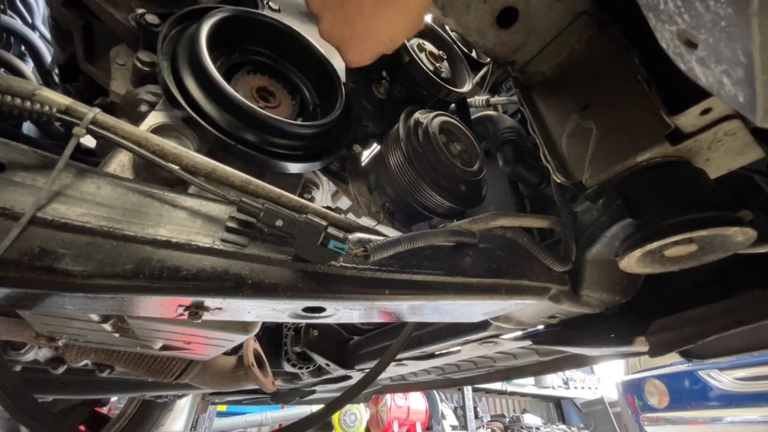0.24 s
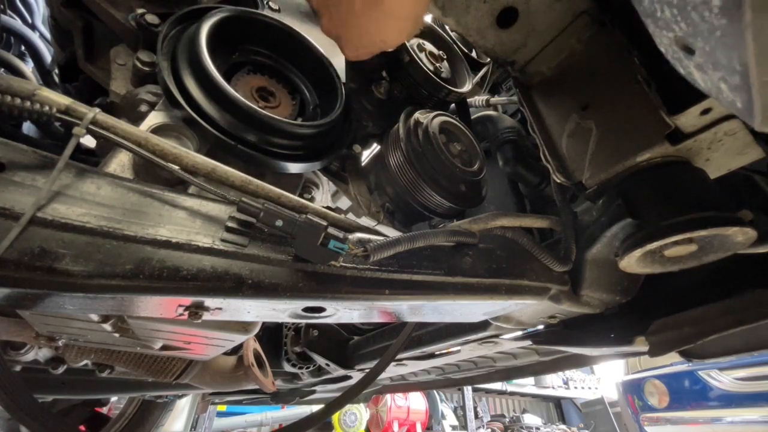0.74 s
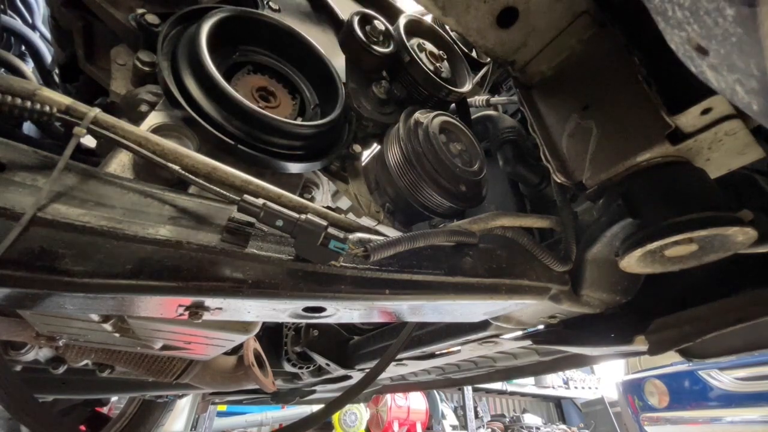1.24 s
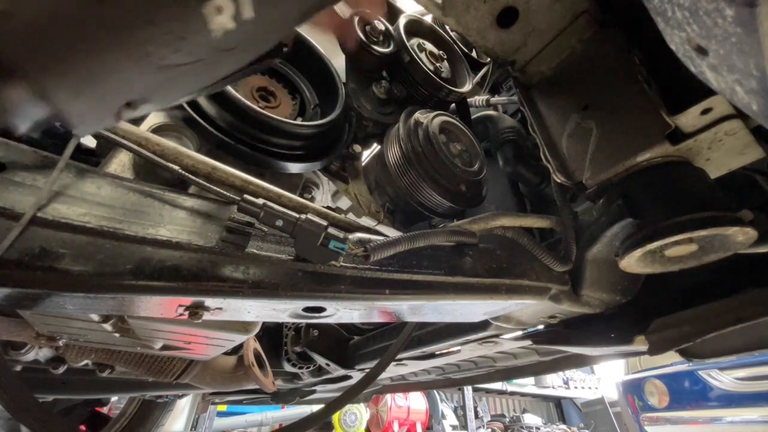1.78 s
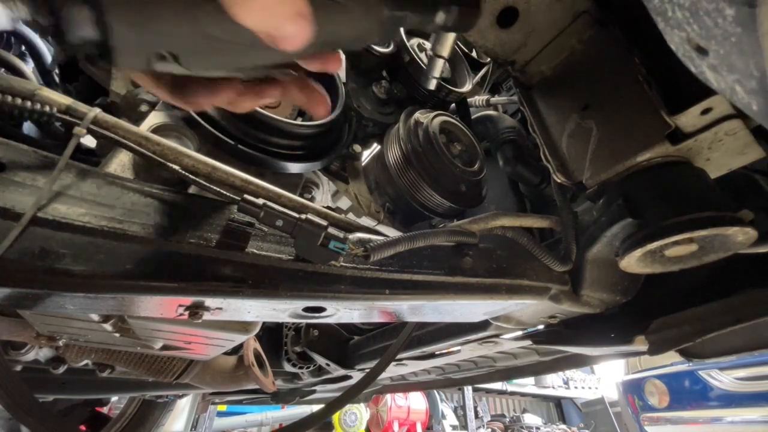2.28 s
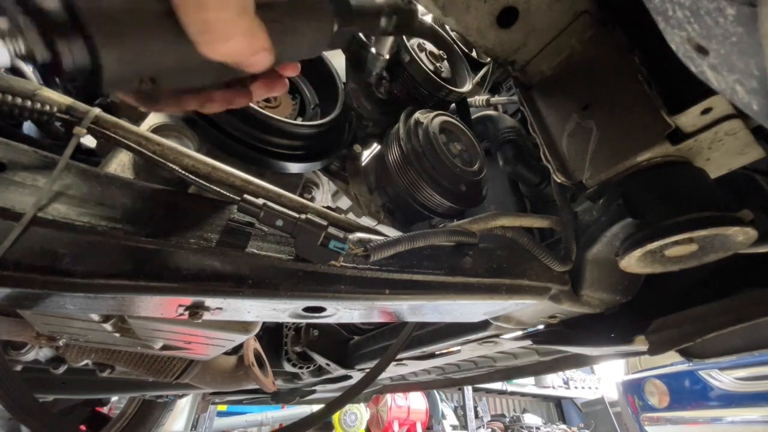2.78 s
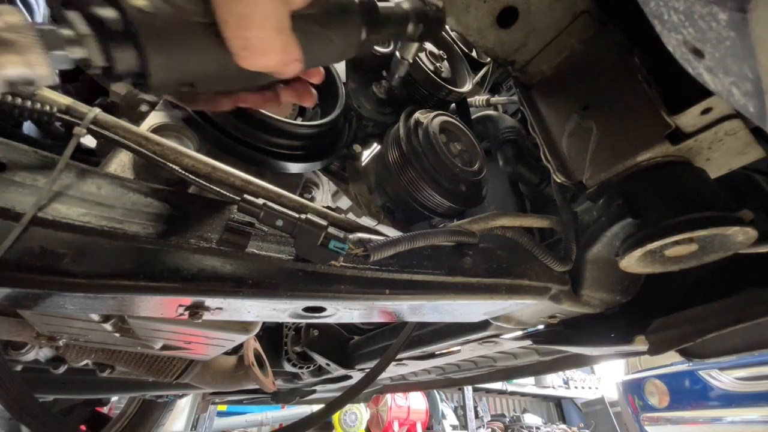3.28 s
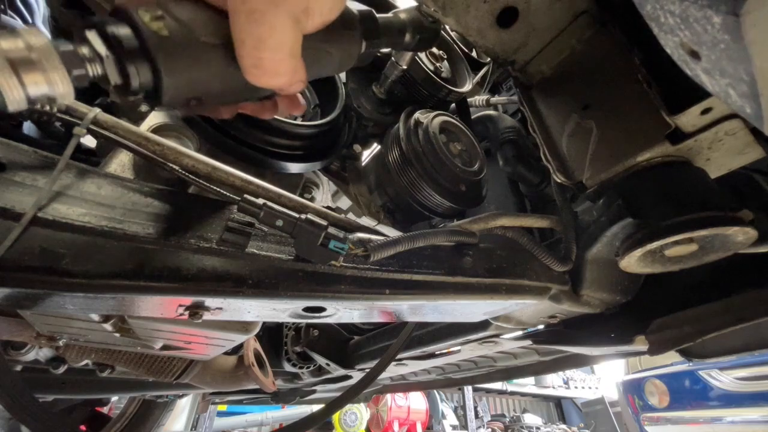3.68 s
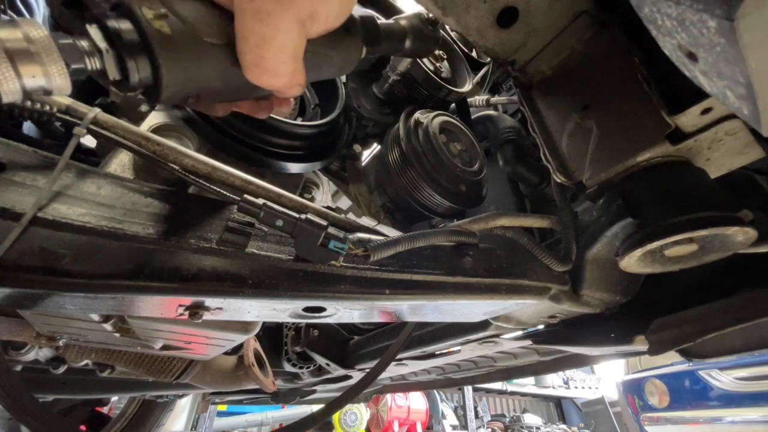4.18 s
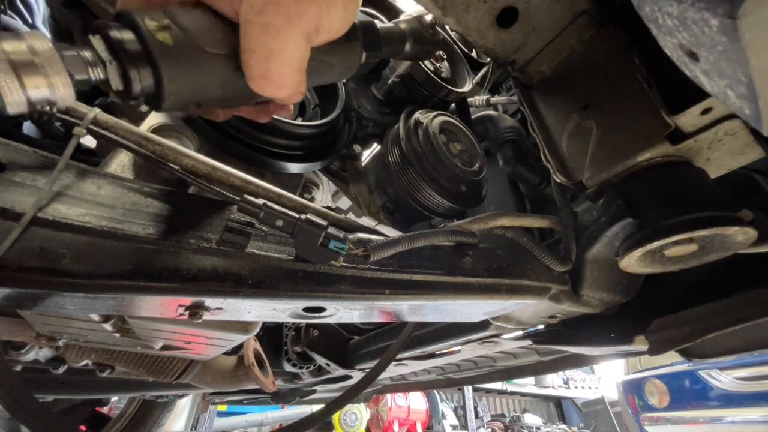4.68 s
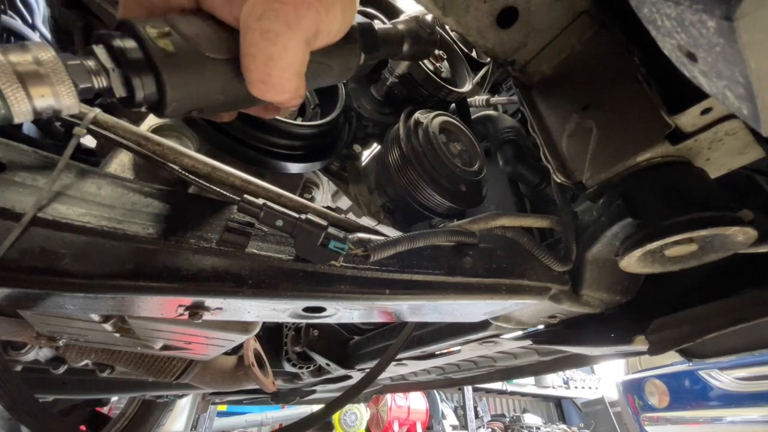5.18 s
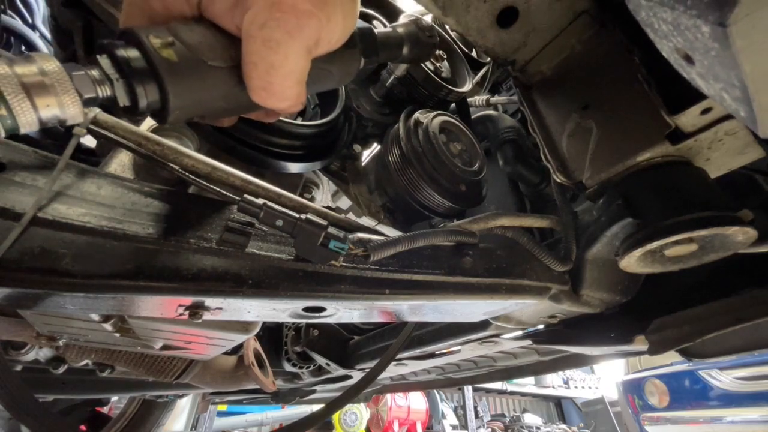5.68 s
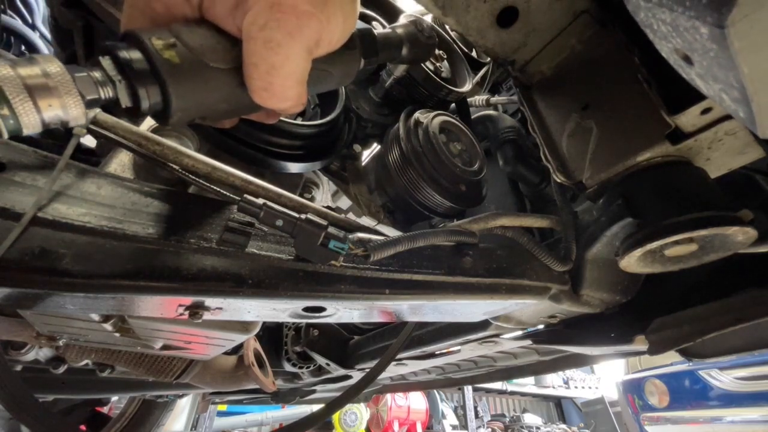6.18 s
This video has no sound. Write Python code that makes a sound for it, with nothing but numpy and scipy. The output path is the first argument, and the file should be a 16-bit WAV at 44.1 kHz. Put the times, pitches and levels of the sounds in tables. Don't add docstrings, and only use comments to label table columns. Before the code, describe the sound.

Quiet low garage rumble with soft hand and sleeve rubbing, then a cluster of small taps and clamp tinkles as an air tool is carried in. One loud steel knock, lighter metal clicks and hollow plastic thumps follow. The air ratchet then fires three short hissing, whining bursts and a long continuous run. Close stereo camera microphone, mostly dry in the engine bay, the background ducking under the tool.

```python
import sys
import numpy as np
from scipy import signal
from scipy.fft import rfft, irfft, next_fast_len
from scipy.io import wavfile
from scipy.ndimage import uniform_filter1d

SR = 44100
rng = np.random.default_rng(int(sys.argv[2]) if len(sys.argv) > 2 else 0)


def generate_wav(sig):
    pcm = np.round(np.clip(np.atleast_2d(sig).T, -1, 1) * 32767).astype(np.int16)
    wavfile.write(sys.argv[1], SR, pcm)


def boost(x):
    u = np.asarray(x, float) / 20
    return 10 ** u


N = 283959
T = np.arange(N) / SR

# (open [s], shut [s], spin-up [s], start whine [dB], coasting whine [dB])
PULLS = [
    (3.868, 4.031, .031, -8, -2),
    (4.331, 4.585, .041, -7, -10),
    (4.727, 4.974, .033, -25, -8),
    (5.064, 6.6, .041, -30, -30),
]
# (time [s], vane passes [Hz])
TOP_SPEED = [(3.9, 1200), (4.03, 1190), (4.39, 1790), (4.425, 1765), (4.46, 1795), (4.53, 1800),
             (4.58, 1770), (4.82, 1775), (4.89, 1768), (4.97, 1720), (5.12, 1722), (5.22, 1716),
             (5.3, 1686), (5.4, 1662), (5.6, 1603), (5.8, 1556), (6.0, 1516), (6.1, 1510), (6.44, 1520)]
# (running whine [dB], valve puff [dB], thump [dB])
EFFORT = [(-31.5, -10, -20), (-36.5, -12.5, -32), (-33.5, -33, -47), (-39, -63, -49)]
LAG_POWERS = (1.3, 2.2, 1.5, 1.8)
COASTS = (.048, .043, .044, .047)
STRAIN_LEVELS = (-23, -25.5, -38, -43)
OCTAVE_LEVELS = (-6, 4, -10, 2)
STRAIN_S = .082


def rotor():
    hz, labour, running, pumping, puff, thump, strain, octave = np.zeros((8, N))
    top = np.interp(T, *np.transpose(TOP_SPEED))
    for pull, effort, lag, strain_db, coast, octave_db in zip(
            PULLS, EFFORT, LAG_POWERS, STRAIN_LEVELS, COASTS, OCTAVE_LEVELS):
        on, off, rise, start_db, coast_db = pull
        run_db, puff_db, thump_db = effort
        since, after, now = np.maximum(T - on, 0), np.maximum(T - off, 0), T >= on
        spin_up = .05 + .95 * (1 - np.exp(-(since / rise) ** lag))
        hz[now] = (top * spin_up * np.exp(-after / coast))[now]
        octave[now] = octave_db
        slow = np.exp(-(hz / 850) ** 6 - (since / .05) ** 6)
        labour[now] = (boost(start_db) * slow * np.minimum(since / .006, 1))[now]
        running[now] = (boost(run_db) * np.exp(-after / .006) * np.minimum(since / .052, 1) ** 3)[now]
        suction = np.exp(-after / .027) + .11 * np.exp(-after / .065)
        pumping[now] = (boost(coast_db) * (1 - np.exp(-(after / .014) ** 2)) * suction)[now]
        strain[now] = (boost(strain_db) * np.exp(-(since / STRAIN_S) ** 4))[now]
        puff += boost(puff_db) * since / .007 * np.exp(1 - since / .007)
        jolt = since / 0.015 * np.exp(1 - since / 0.015)
        thump += boost(thump_db) * jolt * np.sin(2 * np.pi * 70 * since)
    return hz, labour, running, pumping, puff, thump, strain, octave


# (jet [dB], first surge [dB], valve opening [s])
FLOW = [(-16, 4.5, 0.0042), (-18, 7, 0.0024), (-16.5, 1.2, 0.022), (-20, 0, 0.02)]
# (level over jet [dB], share of surge [1], share of sag [1])
LAYERS = [
    (0, 0.58, 0.87),
    (-5.5, 1.4, 0.45),
    (-30.5, 2.86, 0.62),
]
# (linger [s], fall [dB/s], back-puff [dB], leak [dB])
DYING = [
    (.001, 422, -1, -57),
    (0.031, 426, -1, -50.5),
    (.04, 350, 9.5, -51),
]
# (time [s], jet level [dB], fall time [s per 10 dB])
SPURTS = [(4.075, -30, -0.22), (4.102, -55, -0.5), (4.376, -7.5, -0.0228)]
SHUT_DB, SURGE_S, SAG_DB, SAG_S, BACK_PUFF_S = 26.5, 0.072, 10, 0.54, 0.038


def airflow():
    gains = []
    for (over_db, surge, sag), (linger, fall_db, back_db, leak_db) in zip(LAYERS, DYING):
        gain = boost(leak_db) * (T >= PULLS[0][0])
        for (on, off, *_), (db, surge_db, opening) in zip(PULLS, FLOW):
            opened = on + opening
            since, after = np.maximum(T - opened, 0), np.maximum(T - off, 0)
            level_db = db + over_db - SHUT_DB * np.maximum((opened - T) / opening, 0)
            level_db = level_db + surge * surge_db * np.exp(-since / SURGE_S)
            level_db = level_db - sag * SAG_DB * (1 - np.exp(-since / SAG_S))
            level_db = level_db + back_db * np.minimum(after / BACK_PUFF_S, 1)
            level_db = level_db - fall_db * np.maximum(after - linger, 0)
            gain = np.hypot(gain, boost(level_db))
        gains.append(gain)
    jet, roar, gust = gains
    return np.hypot(jet, swells(SPURTS, 0.15) * (T >= PULLS[0][0])), roar, gust


# (multiple [1], driven level [dB], coasting level [dB])
VANES = [(1, 0, 0), (2, -5, -13), (3, -6, -27), (4, -9, -36), (5, -6, -42), (6, -19, -46)]
# (frequency [Hz], level [dB])
MUFFLER = [(100, -17), (250, -6), (500, -1), (900, 2.5), (1380, -5), (1580, -18), (1640, -5.5), (1790, 4),
           (2300, 2), (3050, 5), (3250, 4), (3400, -3), (3600, 3), (4750, 5), (5350, -6), (6200, 11),
           (8000, -1), (8550, 21), (9000, 14), (9600, 34)]
# (frequency [Hz], level [dB])
STRAIN = [(1500, -21), (2050, 3.5), (2400, -4), (2750, 9.5), (3300, -8), (4500, -27)]
# (frequency [Hz], level [dB])
JET = [(3000, -22.5), (5000, -10), (7000, -6), (8500, 0), (11500, 2.5), (13000, 2.5), (16000, -6.5)]
# (frequency [Hz], level [dB])
ROAR = [(800, -20), (1650, -8), (2250, -2.5), (3000, 0), (4000, -1), (5500, -2.5), (7500, -3.5),
        (10000, -52)]
# (frequency [Hz], width [Hz], level over the rest [dB])
HOUSING = [(2504, 126, 6), (3180, 110, 2)]
# (frequency [Hz], level [dB])
GUST = [(40, -32), (150, -7), (250, -19), (500, -8), (850, -2), (1100, -8.5), (1450, -5.5), (1900, -12.5),
        (3000, -23)]
# (frequency [Hz], level [dB])
PUFF = [(60, -20), (190, -13), (290, 0), (500, -3), (800, -12), (1400, -30)]
PASSES_PER_PAWL = 22.5


def ratchet():
    hz, labour, running, pumping, puff, thump, strain, octave = rotor()
    unsteady = .012 * np.clip((1600 / (hz + 1)) ** 3, 1, 3)
    jitter = uniform_filter1d(rng.standard_normal(N), size=300)
    turns = np.cumsum(hz * (1 + unsteady * jitter)) / SR
    flutter = boost(.6 * evened(uniform_filter1d(rng.standard_normal((len(VANES), N)), size=700)))
    whine = np.zeros(N)
    for waver, (k, db, coast_db) in zip(flutter, VANES):
        driven = waver * running * boost(db + octave * (k == 2))
        undriven = (labour + pumping) * boost(coast_db)
        whine += (driven + undriven) * boost(read(MUFFLER, k * hz)) * np.cos(2 * np.pi * k * turns)
    for k in range(2, 5):
        whine += strain * boost(read(STRAIN, k * hz)) * np.cos(2 * np.pi * k * turns)
    stroke = turns / PASSES_PER_PAWL
    bite = boost(2.2 * rng.standard_normal(400))[stroke.astype(int) % 400] * np.exp(-(stroke % 1) / .1)
    spit = boost(0.53 * evened(uniform_filter1d(rng.standard_normal(N), size=60)))
    jet, roar, gust = airflow()
    air = jet * boost(9) * hiss(JET, 0.19, spit * (1 + 0.4 * bite))
    air = air + roar * boost(3.0) * peaked(hiss(ROAR, 0.75, 1 + 1.19 * bite), HOUSING)
    air = air + gust * boost(8.0) * hiss(GUST, 1.0) + puff * hiss(PUFF, 1.2)
    return np.sqrt(2) * whine + air + thump


# (frequency [Hz], level [dB])
SEEP = [(300, -25), (480, -2), (980, 0), (1200, -20), (1650, -18), (2000, -4), (2700, -9), (5000, -16)]
# (time [s], level [dB], fall time [s per 10 dB])
SEEPS = [(4.125, -42, .6)]


def seep():
    return swells(SEEPS, .02) * hiss(SEEP, 1.5)


# (time [s], peak [dB], thud over it [dB], crack over it [dB], t60 [s])
TAPS = [(0.5026, -57, -9, -27, 0.079), (0.871, -55, -4, 9, 0.0386), (0.952, -34.5, -3, 14, 0.015),
        (1.144, -53.5, -15, 5, 0.107), (1.292, -27, -4, -10, 0.066), (1.379, -27.5, -5, -9, 0.08),
        (1.4246, -19.5, -7, -12, 0.16), (1.5388, -33, -4, -15.5, 0.036), (1.5565, -34, -4, -17, 0.07),
        (1.608, -37, -6, 8, 0.058), (1.6675, -29.5, -5, -6, 0.096), (1.6995, -21.5, -4, -13, 0.074),
        (1.728, -19.5, -2.5, -10, 0.15), (2.0367, -31.5, 1.5, -24.5, 0.19), (2.149, -34.5, -2, -25, 0.18)]
# (time [s], peak [dB], thud [dB], crack [dB], t60 [s])
KNOCKS = [(2.3573, -1, -19, -5, 0.064), (2.914, -23, -28, -5, 0.046), (3.115, -24, -25, -32, 0.072),
          (3.1325, -21.5, 0, -31, 0.063), (3.208, -28, -8, -32, 0.034), (3.3603, -22, -24, -3, 0.039),
          (3.3824, -16, -10, -19, 0.077), (3.4389, -33.5, 10, -21, 0.042), (3.4616, -35.5, 3.5, -6, 0.024),
          (3.492, -44, 4, -27, 0.081), (3.5236, -43, 4, -33, 0.088), (3.602, -35.5, -12, -31.5, 0.089),
          (4.1006, -20.5, 2, 4, 0.035), (4.63, -27, -1.5, 7, 0.035), (4.7084, -34, -1, 0, 0.031),
          (4.7224, -33, 1, 3, 0.19), (5.0338, -25, -4, 3, 0.031)]
# (time [s], peak [dB], thud [dB], crack [dB], t60 [s])
MORE_TAPS = [(1.2223, -45, -10, -6, .03), (1.511, -33, -10, -8, .04), (1.639, -33, -10, -11, .04),
             (1.994, -39.5, -8, -6.5, .03), (2.401, -26.5, 3, -14, .04), (.968, -36.5, 6, -15, 0.071)]
# (frequency [Hz], level [dB])
STEEL = [(1060, 3), (1310, 3), (1585, -1), (1810, -3), (2100, -5), (2540, -5), (2900, -7), (3500, -10),
         (4200, -8)]
# (frequency [Hz], level [dB])
HOLLOW = [(190, -6), (330, -4), (490, -3), (600, 0), (860, -7)]


def knocks():
    out, t = np.zeros(N + 9000), np.arange(4500) / SR
    sag = t + .009 * (1 - np.exp(-t / .022))
    for s, db, thud_db, crack_db, t60 in TAPS + KNOCKS + MORE_TAPS:
        luck, grit = rng.standard_normal((2, 14)), rng.standard_normal((2, 4500))
        steel, thud = np.zeros((2, 4500))
        for (f, d), a, b in zip(STEEL, *luck):
            steel += boost(d + 1.5 * b - 60 * t / .011) * np.sin(2 * np.pi * f * (1 + .012 * a) * t + 4 * b)
        for (f, d), a, b in zip(HOLLOW, *luck[:, 9:]):
            thud += boost(d + 1.0 * b - 0.32 * f * t) * np.sin(2 * np.pi * f * .76 * sag + 3 * a)
        scrape = grit * boost(-60 * t / t60) * np.minimum(t / 0.00027, 1)
        ring = signal.fftconvolve(scrape[0], steel)[:4500]
        rough = 1 + 3 * uniform_filter1d(grit[1], size=120)
        thud = thud * rough * boost(-60 * t / (1.8 * t60)) * np.minimum(t / .004, 1)
        blow = ring / abs(ring).max() + boost(thud_db - 2.5) * thud / abs(thud).max()
        blow = blow + boost(crack_db + 0.5) * np.diff(scrape[1], prepend=0)
        out[round((s - .0015) * SR):][:4500] += boost(db + 1.0) * blow
    return out[:N]


def rings(blows, modes, attack=0.00054):
    out, t = np.zeros(N + 6000), np.arange(6000) / SR
    for (s, db), luck in zip(blows, rng.standard_normal((len(blows), 2, len(modes)))):
        ring = np.zeros(6000)
        for (f, d, t60), a, b in zip(modes, *luck):
            decay = boost(d + 1.4 * b - 60 * t / t60)
            ring += decay * np.sin(2 * np.pi * f * (1 + 0.01 * a) * t + 3 * b)
        out[round(s * SR):][:6000] += boost(db) * ring * np.minimum(t / attack, 1)
    return out[:N]


# (frequency [Hz], level [dB], t60 [s])
BRACKET = [(634, -12, 0.12), (1050, -4.5, 0.055), (1166, -21.5, 0.11), (1314, 0, 0.055),
           (1590, -1.5, 0.059), (1850, -2, 0.07), (2160, -6, 0.06), (2480, -7, 0.11), (2980, -3.5, 0.037),
           (4090, -10, 0.082), (5400, -21, .068)]
# (frequency [Hz], level [dB], t60 [s])
SOCKET = [(1340, -1, 0.06), (2040, -13, 0.063), (2380, -8.5, 0.033), (2856, -2.5, 0.024), (3395, -3, 0.041),
          (4100, -4.5, 0.053), (4900, -10.5, .052), (5320, -7, 0.025), (6300, -16, .04)]
# (frequency [Hz], level [dB], t60 [s])
LEVER = [(700, -14, .04), (2060, -0.5, 0.025), (2670, -0.5, .03), (3150, 4, .03)]
# (time [s], level [dB])
BRACKET_BLOWS = [(1.293, -39.5), (1.4235, -41), (2.3585, -8.5), (2.51, -44), (2.686, -41), (3.492, -50),
                 (3.527, -47)]
# (time [s], level [dB])
SOCKET_BLOWS = [(2.9115, -24), (3.1125, -32), (3.207, -54), (3.3595, -21), (3.383, -23.5), (3.441, -44),
                (3.6015, -48)]
# (time [s], level [dB])
LEVER_BLOWS = [
    (3.867, -27),
    (4.3285, -14.5),
    (4.719, -39),
]


def struck_metal():
    return rings(BRACKET_BLOWS, BRACKET) + rings(SOCKET_BLOWS, SOCKET) + rings(LEVER_BLOWS, LEVER)


# (frequency [Hz], level [dB], t60 [s])
COVER = [(250, -10, .16), (400, -6, .15), (545, 0, .06), (625, -4, .07), (880, -10, .08)]
# (time [s], level [dB])
COVER_BLOWS = [(3.132, -14.5), (3.2055, -22), (3.382, -9.5), (1.4, -33)]
# (frequency [Hz], level [dB], t60 [s])
CLAMP = [(2950, -4, .035), (3250, -2, .04), (3500, 0, .04), (4050, -4, .03), (4800, -5, .03)]
# (time [s], level [dB])
CLAMP_BLOWS = [(1.294, -38), (1.318, -41), (1.3794, -34), (1.4248, -30), (1.44, -35), (1.6378, -37),
               (1.6668, -33), (1.6992, -34), (1.7266, -30), (1.75, -36), (1.835, -38), (2.04, -44),
               (2.1512, -42)]


def cover_and_clamp():
    return rings(COVER_BLOWS, COVER, .004) + rings(CLAMP_BLOWS, CLAMP)


# (start [s], length [s], frequency [Hz],
# level [dB])
HUMS = [(0.961, 0.12, 70.5, -33), (1.44, 0.21, 74.7, -32), (1.709, 0.124, 74.7, -25),
        (1.972, 0.18, 76, -29.5), (2.139, 0.17, 70.7, -36.5), (1.4, .08, 185, -41), (1.66, .14, 186.4, -39),
        (1.279, .09, 612, -38.5), (2.099, .16, 612, -52.5), (1.699, 0.13, 855, -40),
        (2.12, 0.072, 870, -47), (2.412, 0.066, 1052, -47), (2.492, 0.039, 1328, -42),
        (2.597, .09, 1590, -50), (3.869, .03, 285, -15.5), (4.332, .05, 204, -22), (4.038, .025, 110, -31),
        (5.627, 0.21, 1330, -52.5), (5.78, 0.21, 1160, -45.5), (5.9, .2, 590, -48), (5.932, 0.13, 820, -48)]


def hums():
    out = np.zeros(N)
    for s, length, hz, db in HUMS:
        t = np.arange(0, length, 1 / SR)
        wobble = 1 + .25 * uniform_filter1d(rng.standard_normal(len(t)), size=600)
        tone = np.sin(2 * np.pi * hz * np.cumsum(wobble) / SR)
        out[round(s * SR):][:len(t)] += boost(db) * np.sin(np.pi * t / length) ** 0.55 * tone
    return np.sqrt(2) * out


# (time [s], fall time [s per 10 dB], drag [dB], scuff [dB], fizz [dB])
STROKES = [(.03, 0.15, -52, -64, -57.5), (.16, 0.5, -48.5, -88.5, -101), (.32, 0.2, -66, -69, -66.5),
           (.68, 0.5, -61.5, -93.5, -95.5), (.8, 0.4, -70, -69, -59.5), (.91, 0.08, -66, -53, -46.5),
           (.954, 0.02, -35.5, -39.5, -37), (1.25, -0.55, -43, -66, -55), (1.52, 0.72, -37.5, -47.5, -44),
           (1.65, 0.21, -30, -42.5, -46), (1.8, 0.11, -32, -47, -46), (1.86, 0.1, -55, -62, -40),
           (1.97, .5, -42.5, -57, -51.5), (2.18, -0.73, -44, -58.5, -66.5), (2.32, -1.4, -64, -64, -55.5),
           (2.42, 0.12, -47, -53, -76), (2.52, 0.18, -49, -47.5, -74), (2.67, 0.2, -50.5, -56, -65),
           (2.95, 0.15, -52, -60, -84), (3.18, 0.15, -38.5, -69, -78), (3.42, 0.04, -32, -56, -85),
           (3.54, 2, -51, -70.5, -70.5)]
# (time [s], fall time [s per 10 dB], drag [dB], scuff [dB], fizz [dB])
GRABS = [(.503, 0.36, -43, -65, -90), (1.147, 0.32, -70, -58, -62), (1.295, 0.18, -37, -46, -44),
         (1.425, 0.17, -27.5, -41, -45)]
# (steepness [1], resting level [dB])
CONTACT = [
    (1.05, -70),
    (1.4, -70.5),
    (2.6, -94.5),
]
STROKE_RISE, GRAB_RISE = 0.44, 0.022


def contact(order):
    steep, rest_db = CONTACT[order]
    rest_power = boost(2 * rest_db) * (T < PULLS[0][0])
    strokes = swells([(row[0], row[2 + order], row[1] / steep) for row in STROKES], STROKE_RISE)
    grabs = swells([(row[0], row[2 + order], row[1] / steep) for row in GRABS], GRAB_RISE)
    return np.sqrt(rest_power + strokes ** 2 + grabs ** 2)


# (frequency [Hz], level [dB])
DRAG = [(110, -22), (185, 7.5), (250, -4), (345, 4), (470, 0), (615, 2.5), (900, -3.5), (2300, -15.5),
        (3500, -39)]
# (frequency [Hz], level [dB])
SCUFF = [(500, -27), (1300, -2.5), (2000, -3.5), (3500, -3), (5000, -8.5), (8000, -16.5)]
# (frequency [Hz], width [Hz], level over the rest [dB])
BAY = [(187, 18, 5.3), (363, 32, 5), (614, 29, 2.1), (850, 60, 5.7), (1275, 46, 8.2), (1930, 58, 4.1)]


def handling():
    starts = (rng.random(N) < 140 / SR) * rng.exponential(1, N)
    slips = 1 + 0.29 * signal.lfilter([1], [1, -.995], starts)
    drag = contact(0) * boost(-1.5) * hiss(DRAG, 1.06)
    scuff = contact(1) * boost(6.5) * hiss(SCUFF, 0.94, slips)
    fizz = contact(2) * boost(6.0) * hiss(JET, 2.6, slips)
    return peaked(drag + scuff, BAY) + fizz


# (frequency [Hz], level [dB])
BRUSH = [(250, -20), (600, -7), (1200, -7), (2200, 1), (2500, -14), (4000, -40)]
# (time [s], level [dB], fall time [s per 10 dB])
BRUSHES = [(.51, -56, 0.2), (.55, -51, 0.1)]
CRACKLES_PER_S, CRACKLE_DB = 70, -5


def sleeve():
    brush = swells(BRUSHES, .04) * hiss(BRUSH, 1.3)
    snaps = (rng.random(N) < CRACKLES_PER_S / SR) * np.minimum(rng.exponential(1, N), 3)
    grains = signal.lfilter([1], [1, -.988], snaps) * rng.standard_normal(N)
    crackle = evened(peaked(colour(grains, lambda hz: boost(read(SCUFF, hz))), BAY))
    rubbing = (T > GRABS[2][0]) * (T < KNOCKS[0][0])
    return brush + boost(CRACKLE_DB) * contact(1) * crackle * rubbing


# (time [s], level [dB])
RUMBLE = [(0.0, -37), (.84, -40.5), (1.2, -38.5), (1.6, -29.5), (2.3, -39), (2.5, -41), (3.3, -45),
          (3.85, -40.5), (3.91, -52), (3.95, -56), (4.11, -60), (4.27, -52), (4.41, -49), (4.57, -42),
          (4.68, -61.5), (4.8, -41.5), (5.06, -58), (5.29, -53), (6.44, -58)]
# (time [s], level [dB], fall time [s per 10 dB])
BUMPS = [(.14, -33, -0.12), (.5, -40, 0.2), (.98, -34.5, 0.08), (1.5, -33, 0), (1.77, -33, -0.04),
         (2.03, -31, 0), (2.4, -31.5, 0.12), (2.72, -43, 0.2), (2.9, -41.5, 0.5), (3.17, -36, 0.16),
         (3.41, -30.5, 0.04), (3.62, -44, .1), (3.89, -25, -0.06), (4.045, -30.5, -0.05), (4.35, -34, 0.02),
         (4.75, -47, -0.45), (5.11, -49, -0.4)]
# (frequency [Hz], level [dB])
DRONE = [(20, -52), (35, -18), (52, -1), (75, 1), (100, 2.5), (125, -5), (180, -9.5), (350, -16),
         (600, -38), (1200, -56)]
# (frequency [Hz], width [Hz], level over the rest [dB])
PANEL = [(76, 6.8, 4.1), (102, 13, 2.6)]
BUMP_RISE = 0.57


def rumble():
    bed = boost(np.interp(T, *np.transpose(RUMBLE)))
    return np.hypot(bed, swells(BUMPS, BUMP_RISE)) * evened(peaked(hiss(DRONE, 1.4), PANEL))


def evened(x):
    return x / np.sqrt(np.mean(x ** 2) + 1e-20)


def read(points, hz, order=1):
    table = np.transpose(points)
    return np.interp(np.log(hz + 1), np.log(table[0] + 1), table[order])


def colour(x, gains):
    size = next_fast_len(N + 4096)
    return irfft(rfft(x, size) * gains(np.fft.rfftfreq(size, 1 / SR)), size)[..., :N]


def peaked(x, peaks):
    return colour(x, lambda hz: 1 + sum((boost(db) - 1) / (1 + (2 * (hz - f) / width) ** 2)
                                        for f, width, db in peaks))


def drift(shape, bands, frames):
    across = uniform_filter1d(rng.standard_normal(shape), size=bands, axis=0)
    return evened(uniform_filter1d(across, size=frames, axis=1))


def hiss(shape, patchy_db, drive=1):
    z = signal.stft(rng.standard_normal(N), SR, nperseg=512)[2]
    patches = boost(patchy_db * drift(z.shape, 5, 6))
    patchy = signal.istft(z * patches, SR, nperseg=512)[1][:N]
    return evened(colour(patchy * drive, lambda hz: boost(read(shape, hz))))


def swells(rows, rise):
    t = T[::32]
    power = np.zeros(len(t))
    for s, db, fall in rows:
        power += boost(2 * db - 20 * np.maximum((t - s) / fall, (s - t) / (rise * fall))) \
            if fall else boost(2 * db - 20 * np.maximum((t - s) / np.float64(fall), (s - t) / (rise * fall)))
    return np.interp(T, t, np.sqrt(power))


def echoes(x, t60):
    t = np.arange(round(t60 * SR)) / SR
    tail = rng.standard_normal(len(t)) * boost(-60 * t / t60)
    return signal.fftconvolve(x, tail / np.linalg.norm(tail))[:N]


SCATTER_LAG = 150


def scattered(x):
    z = signal.stft(x, SR, nperseg=512)[2]
    turned = z * np.exp(2j * drift(z.shape, 3, 20))
    return 1.34 * np.pad(signal.istft(turned, SR, nperseg=512)[1], (SCATTER_LAG, 0))[:N]


# (frequency [Hz], likeness [1], lead [rad], level for the tool [dB], level for the hands [dB])
PORTS = [(60, .95, 0, -1.5, -.3), (140, .9, 0, -1.5, 0), (300, .5, 0, -5, -1), (700, .3, -.5, -8.5, -4),
         (1800, .4, .1, -4.5, -2), (3000, .55, -.8, -5, -3), (5500, .4, -.7, -5.5, -4),
         (7300, .5, -.9, -4, -2), (8550, .99, -.1, 0, 0), (9200, .86, 1.3, 0, 0), (9950, .999, 3.12, 0, 0),
         (10450, .999, 3.17, 0, 0), (11000, .9, 4.8, 0, 0), (11900, .97, 6.0, 0, 0)]


def scene():
    hits, struck = knocks(), struck_metal()
    left = ratchet() + seep()
    left = left + hits + boost(-23.5) * echoes(hits, 1.0)
    left = left + struck + boost(-22.5) * echoes(struck, 0.98)
    left = left + cover_and_clamp() + hums() + handling() + sleeve() + rumble()

    def same(hz):
        return np.clip(read(PORTS, hz), 0, 1)

    direct = colour(left, lambda hz: same(hz) * np.exp(1j * read(PORTS, hz, order=2)))
    right = direct + colour(scattered(left), lambda hz: np.sqrt(1 - same(hz) ** 2))
    tool = colour(right, lambda hz: boost(read(PORTS, hz, order=3)))
    hands = colour(right, lambda hz: boost(read(PORTS, hz, order=4)))
    return np.array([left, np.where(T < PULLS[0][0] - .01, hands, tool)])


# (frequency [Hz], share of loud moments [1])
KEPT = [(12000, 1), (12300, .7), (12900, .3), (13200, .03), (14300, .03), (14600, .4), (15700, .4)]


def thinned(x):
    hz, _, z = signal.stft(x, SR, nperseg=1024)
    band, block = (hz // 600).astype(int), np.arange(z.shape[2]) // 3
    chance = rng.random((band.max() + 1, block.max() + 1))[band][:, block]
    loud = (abs(z[0, hz > 8000]) ** 2).sum(0) > boost(-74)
    share = read(KEPT, hz)[:, None]
    passed = (share >= 1) | ((chance < share) & loud)
    return signal.istft(z * passed, SR, nperseg=1024)[1][:, :N]


def low_pass(x):
    return signal.sosfilt(signal.butter(12, 15940, fs=SR, output="sos"), x)


# (frequency [Hz], level [dB])
TOP_SHELF = [(20, 0), (11500, 0), (12500, -14), (13300, -17), (15700, -15), (16000, -60)]


def record(dry):
    heard = colour(dry, lambda hz: boost(read(TOP_SHELF, hz)))
    return low_pass(thinned(np.clip(heard, -1, 1)))


dry = scene()
out = record(dry)
generate_wav(out)
```